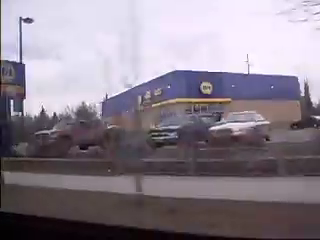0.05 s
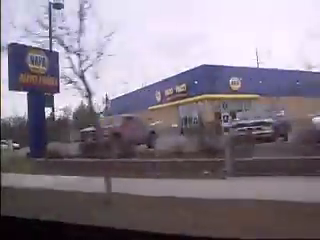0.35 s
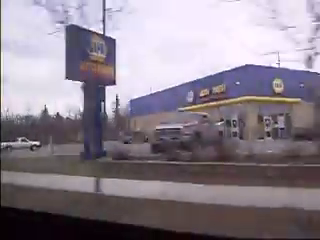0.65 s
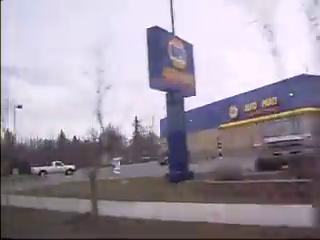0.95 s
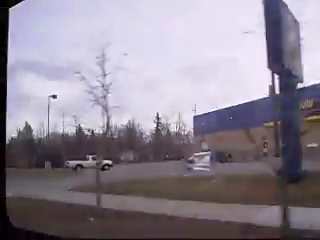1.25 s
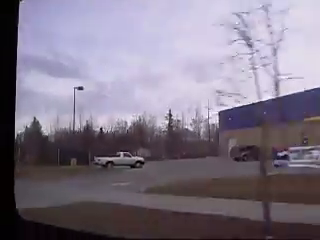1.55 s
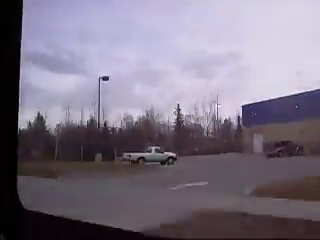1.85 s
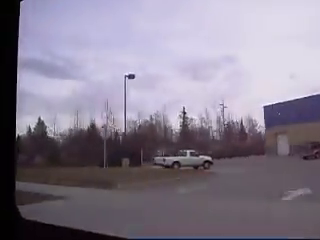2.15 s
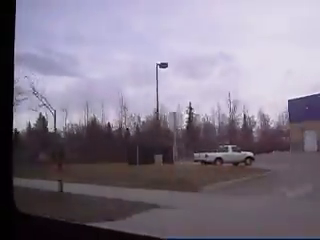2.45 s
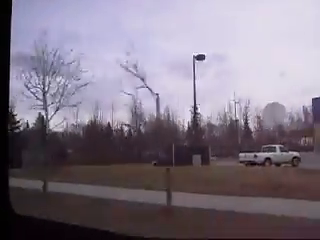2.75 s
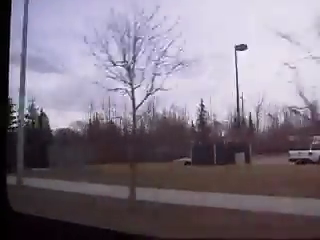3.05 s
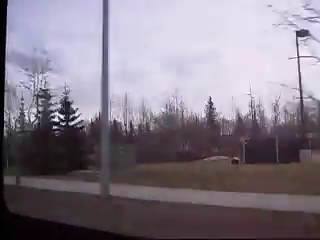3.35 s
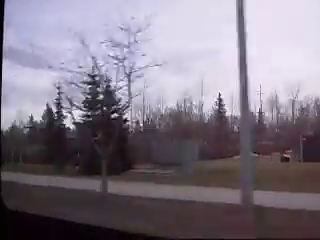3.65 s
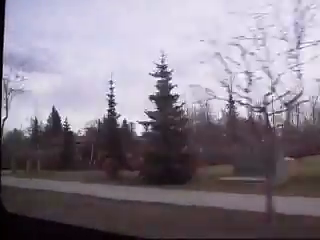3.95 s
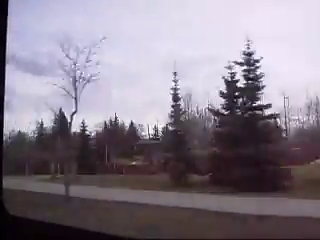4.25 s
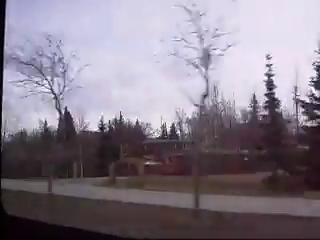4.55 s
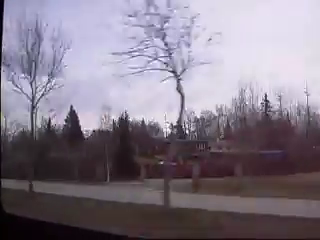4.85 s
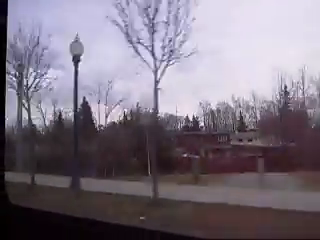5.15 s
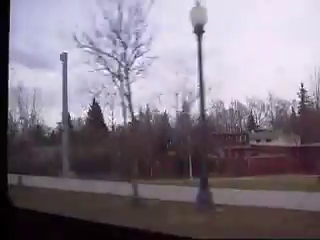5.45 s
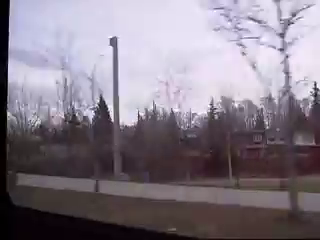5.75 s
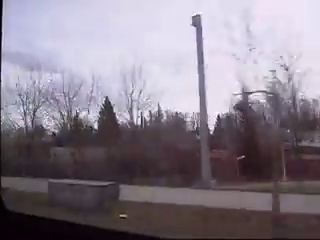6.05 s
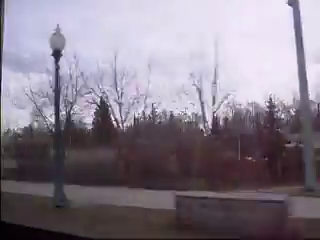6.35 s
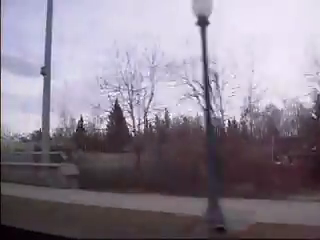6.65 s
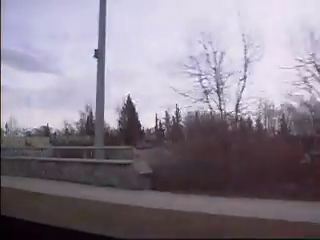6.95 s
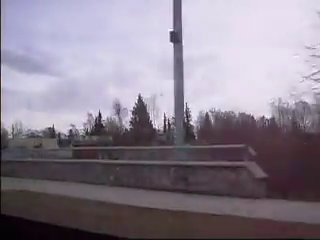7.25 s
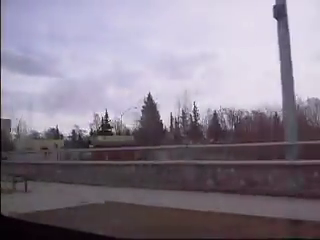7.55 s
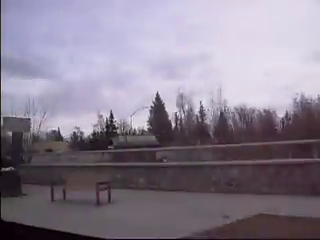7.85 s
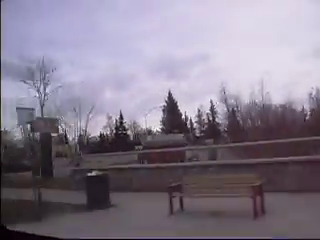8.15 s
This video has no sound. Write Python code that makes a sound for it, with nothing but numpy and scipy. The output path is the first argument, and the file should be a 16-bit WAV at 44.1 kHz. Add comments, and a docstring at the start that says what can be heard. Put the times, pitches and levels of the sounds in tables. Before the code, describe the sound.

Tyres roar through the body of a bus over a low engine hum, picked up by a dull-sounding microphone near the window that adds tiny irregular clicks. A brief puff of hiss comes first, then some mild thumps from the road. Wavering gear whines grow stronger as the engine slows slightly and turns boomier, and a final larger bump sets the cabin panels creaking and rattling.

```python
"""Riding a city bus

Heard by a small camera at a side window, the engine drones and booms more as it eases off,
gear whines ring up and die away, and the tyres roar through the body. A short hiss passes early on.
Bumps rock the cabin and lift the roar; the big one at the end makes the trim chafe, creak and knock.
The camera adds sharp little electrical ticks of its own."""
import sys
import numpy as np
from scipy import signal
from scipy.fft import rfft, irfft, next_fast_len
from scipy.io import wavfile
from scipy.ndimage import uniform_filter1d

SR = 44100
rng = np.random.default_rng(int(sys.argv[2]) if len(sys.argv) > 2 else 0)


def wav_record(signal):
    """Record a signal, one row per channel, as 16-bit PCM in the file named by sys.argv[1]."""
    frames = np.transpose(np.atleast_2d(signal))
    bounded = np.clip(frames, -1, 1)
    # unit amplitude maps onto the largest positive 16-bit level
    quanta = np.round(bounded * 32767).astype(np.int16)
    wavfile.write(sys.argv[1], SR, quanta)


N = 366030
TIME = np.arange(N) / SR

# bumps that rock the body: t/s, half width/s, level/dB
ROAD_BUMPS = [(1.31, .05, -27), (3.63, .025, -22), (4.18, .08, -32), (7.98, .04, -27), (8.105, .03, -15.5),
              (8.172, .014, -21)]


def undb(db):
    """Decibels to gain."""
    return 10 ** (np.asarray(db) / 20)


def unit(x):
    """Scale to rms 1."""
    return x / np.sqrt(np.mean(x ** 2))


def swells(rows):
    """An envelope of bell-shaped swells from rows of t/s, half width/s, level/dB."""
    return sum(undb(db) * np.exp(-.5 * ((TIME - s) / width) ** 2) for s, width, db in rows)


def spike(s, db, width_s):
    """A single bell-shaped spike with no ring."""
    out, around = np.zeros(N), np.arange(-50, 51)
    out[np.clip(int(s * SR) + around, 0, N - 1)] = undb(db) * np.exp(-.5 * (around / SR / width_s) ** 2)
    return out


def wander(rate):
    """A smooth random drift at rms 1, with about rate new values a second."""
    k = int(SR / rate)
    steps = np.repeat(rng.standard_normal(N // k + 2), k)
    return unit(uniform_filter1d(uniform_filter1d(steps, k), k)[:N])


def colour(x, curve):
    """Shape x with an EQ curve of f/Hz, level/dB, and return it at rms 1."""
    size = next_fast_len(N)
    hz = np.maximum(np.arange(size // 2 + 1) * SR / size, 1)
    curve_hz, db = np.transpose(curve)
    low_cut = np.minimum(hz / curve_hz[0], 1) ** 2
    gain = undb(np.interp(np.log(hz), np.log(curve_hz), db)) * low_cut
    return unit(irfft(rfft(x, size) * gain, size)[:N])


def low_pass(x, hz):
    """A steep treble cut."""
    taps = signal.firwin(111, hz, window=("kaiser", 7), fs=SR)
    return signal.fftconvolve(x, taps[None], mode="same", axes=1)


def tone(cycles, order, shimmer_db, jitter_rad):
    """A sine at a multiple of the cycle rate, wavering in level and phase."""
    phase = 2 * np.pi * (order * cycles + rng.random()) + jitter_rad * wander(14)
    return np.sqrt(2) * np.sin(phase) * undb(shimmer_db * wander(16))


def engine_drone(cycles, drone_db=-28):
    """Four firings a cycle make the deep drone; unequal cylinders and gears add weaker tones."""
    # steady engine and drive tones: multiple of the cycle rate, level/dB
    overtones = [(6, -42), (7, -47), (9, -40.5), (11, -42.5), (12, -42.5), (13, -52), (14, -47), (15, -50),
                 (16, -52), (19, -50), (20, -49), (21, -49), (23, -48), (24, -44), (27, -47.5), (28, -47.5),
                 (29, -44.5), (30, -47.5), (30.7, -44.5), (32, -45), (33, -46.5), (34, -49), (61, -48)]
    drone = undb(drone_db) * tone(cycles, order=4, shimmer_db=.5, jitter_rad=.06)
    return drone + sum(undb(db) * tone(cycles, order, shimmer_db=3.5, jitter_rad=.36)
                       for order, db in overtones)


def engine_boom(cycles, cycle_hz, cruise_hz=13.14, cruise_db=-43.5, growth_db_per_hz=15):
    """The second firing harmonic grows as the engine slows."""
    level_db = cruise_db + growth_db_per_hz * (cruise_hz - cycle_hz)
    return tone(cycles, order=8, shimmer_db=1, jitter_rad=.15) * undb(level_db)


def whine_envelope(start, hold, db, rise_s=.04, fall_s=.055, sag_db_per_s=1.5):
    """A whine rings up, sags slowly while held, and dies away."""
    early, late = np.maximum(start - TIME, 0), np.maximum(TIME - start - hold, 0)
    sag_db = sag_db_per_s * np.maximum(TIME - start, 0)
    return undb(db - sag_db) * np.exp(-early / rise_s - late / fall_s)


def gear_whines(cycles, blur_rad=.85, steady_db=-33, throb_depth=.25):
    """Gear meshes sing as load comes and goes; uneven teeth make them flutter."""
    # meshes by name: multiple of the cycle rate, resting level/dB, flutter depth
    meshes = {"low": (35.5, -46, .12), "under": (38.9, -46, .2), "main": (40.5, -42.5, .13),
              "middle": (55.07, -52, .16), "high": (59.85, -46, .3), "top": (71, -50, .3),
              "thin": (95.25, -55, .3), "whistle": (164, -69, .45)}
    # whines that ring up: mesh name, t/s, hold/s, level/dB
    whines = [("main", 0.33, .27, -33), ("main", 1.333, 0.1, -28.5), ("main", 2.334, 0.046, -26.5),
              ("main", 2.48, .06, -32), ("main", 2.71, 0.078, -29), ("main", 3.33, 0.27, -36),
              ("main", 3.65, .58, -33), ("main", 4.7, .2, -30), ("main", 4.93, .1, -24.5),
              ("main", 5.05, 0.43, -23.2), ("main", 5.58, 0.14, -26), ("main", 5.78, 0.17, -29.5),
              ("main", 6.14, 0.056, -25.5), ("main", 6.32, 0.43, -24.3), ("main", 6.86, 0.063, -22.5),
              ("main", 7.02, 0.086, -24), ("main", 7.22, 0.1, -27.5), ("main", 7.4, .24, -30.5),
              ("main", 7.83, 0.3, -28), ("high", .3, .4, -37), ("high", 1.02, .05, -32.5),
              ("high", 1.25, .6, -39), ("high", 2.35, 0.041, -28.5), ("high", 2.52, 0.042, -31.5),
              ("high", 3.236, .1, -32), ("high", 3.4, .25, -38), ("high", 3.69, 0.32, -33),
              ("high", 4.12, 0.25, -34.5), ("high", 4.45, .42, -34), ("high", 4.98, 0.085, -30.5),
              ("high", 5.15, 0.11, -37), ("high", 5.55, 0.41, -36), ("high", 6.1, 0.05, -33),
              ("low", 1.35, 0.48, -36), ("low", 3.31, .14, -33.5), ("low", 3.76, 0.75, -31.3),
              ("low", 4.95, 0.055, -35.5), ("low", 5.74, .22, -31), ("low", 6.15, .17, -34.5),
              ("low", 6.46, .38, -30.5), ("low", 6.9, .6, -32.5), ("low", 7.7, .5, -34.5),
              ("under", 5.35, .55, -31.5), ("under", 7, 1.3, -36), ("middle", 6.4, .72, -33.5),
              ("middle", 7.2, 1.3, -37), ("top", 1, 0.82, -41.5), ("top", 4.75, .85, -42),
              ("thin", 2.3, 1.1, -47), ("whistle", .28, .28, -57), ("whistle", 1.97, .3, -58.5),
              ("whistle", 3.08, 0.81, -57.5), ("whistle", 4.28, .32, -54)]
    out = 0
    for mesh, (order, rest_db, flutter_depth) in meshes.items():
        gain = undb(rest_db)
        for name, start, hold, db in whines:
            if name == mesh:
                gain = np.maximum(gain, whine_envelope(start, hold, db))
        slack = 1 / (1 + gain / undb(steady_db))  # weak whines waver and throb the most
        flutter = 1 + flutter_depth * wander(45)
        throb = 1 + throb_depth * slack * np.sin(2 * np.pi * cycles)
        out += tone(cycles, order, shimmer_db=.6, jitter_rad=blur_rad * slack) * gain * flutter * throb
    return out


def cabin_shake(settle_s=.14):
    """The cabin's shaking energy, 0-1: it builds with each bump and settles afterwards."""
    decay = np.exp(-1 / (settle_s * SR))
    energy = signal.lfilter([1 - decay], [1, -decay], swells(ROAD_BUMPS) ** 2)
    return energy / energy.max()


def tyre_roar(shake, bump_lift_db=5, flutter_db=.53):
    """Tyres roar through the floor and windows, following the road surface and louder over bumps."""
    # colour of the roar inside the cabin: f/Hz, level/dB
    cabin_eq = [(15, 6.5), (60, -4.5), (80, 2), (125, -5), (160, -7.5), (190, -7.5), (220, -10), (270, -7),
                (330, -5.5), (410, -3), (470, -3), (520, -.5), (590, -3.5), (700, -4.5), (775, -2.5),
                (860, -7), (1250, -12), (1600, -21), (2400, -29.5), (3050, -30), (3600, -37), (4400, -36),
                (5150, -36), (5450, -41.5)]
    # the roar as the road surface changes: t/s, level/dB
    surface = [(0, -25.5), (.12, -24), (.85, -26), (1.08, -25), (1.25, -27), (1.42, -25), (1.8, -25),
               (1.98, -27), (2.18, -27.5), (2.38, -25.5), (2.7, -25), (3.15, -26), (3.6, -25), (4.3, -26),
               (5.4, -25.5), (5.7, -24.5), (6.1, -25), (7.6, -26), (8.3, -25.5)]
    roar = colour(rng.standard_normal(N), cabin_eq)
    surface_db = np.interp(TIME, *np.transpose(surface))
    return roar * undb(surface_db + bump_lift_db * shake + flutter_db * wander(15))


def body_thuds(body_hz=20, sway_db=-2.5, rumble_db=-5):
    """Uneven road swings the body at its lowest resonance, with a deep rumble on top."""
    # colour of the rumble: f/Hz, level/dB
    rumble_eq = [(10, -2), (20, 5.5), (35, 6.5), (70, -13.5), (150, -26.5), (400, -47)]
    sway = undb(sway_db) * tone(TIME, body_hz, shimmer_db=1.5, jitter_rad=.3)
    rumble = undb(rumble_db) * colour(rng.standard_normal(N), rumble_eq)
    return (sway + rumble) * swells(ROAD_BUMPS)


def panel_knocks():
    """On the big bump a loose panel strikes its frame and rings briefly."""
    # hits on the frame: t/s, level/dB
    hits = [(8.073, -25), (8.121, -20.5), (8.173, -24)]
    # panel modes: f/Hz, level/dB, t60/s
    modes = [(560, -2, .05), (740, -2, .045), (940, -1, .04), (1180, -3, .035)]
    out = 0
    for s, db in hits:
        age = np.maximum(TIME - s, 0)
        for hz, mode_db, t60 in modes:
            out += undb(db + mode_db - 60 * age / t60) * np.sin(2 * np.pi * hz * age)
    return out


def trim_chafe(slips_per_s=2500, spread_db=3):
    """Shaken panels chafe: dense tiny slips of uneven size."""
    # colour of the rubbing trim: f/Hz, level/dB
    trim_eq = [(400, -9.5), (1000, 15), (1600, 3.5), (2200, 2), (2850, 2), (3700, -5), (4600, -4.5),
               (5050, -4.5), (5600, -8)]
    # rubs on the big bump: t/s, half width/s, level/dB
    rubs = [(7.99, 0.018, -38.5), (8.115, 0.055, -34.5), (8.22, 0.14, -32.5)]
    slips = (rng.random(N) < slips_per_s / SR) * rng.standard_normal(N)
    slips *= undb(spread_db * rng.standard_normal(N))
    return colour(slips, trim_eq) * swells(rubs)


def fixture_creaks(slips_per_s=900, ring_hz=2770, skirt_db_per_octave=-31.5):
    """A fixture sticks and slips as the body twists, ringing one narrow resonance."""
    # creaks on the big bump: t/s, half width/s, level/dB
    creaks = [(7.975, 0.006, -41.5), (8.002, .016, -43), (8.105, .02, -39), (8.172, 0.0073, -36.5)]
    slips = (rng.random(N) < slips_per_s / SR) * rng.standard_normal(N)
    resonance = [(ring_hz / 2, skirt_db_per_octave), (ring_hz, 0), (ring_hz * 2, skirt_db_per_octave)]
    return colour(slips, resonance) * swells(creaks)


def short_hiss(start_s=.692, level_db=-36, rise_s=.013, fade_after_s=.036, fall_s=.04):
    """A brief puff of bright noise that starts abruptly and trails off."""
    # colour of the puff: f/Hz, level/dB
    puff_eq = [(1400, 0), (1850, 3.5), (2250, -6), (2900, 1.5), (3550, -4.5), (4600, -2), (5100, -6),
               (5600, -10)]
    age = TIME - start_s
    attack = np.clip(age / rise_s, 0, 1)
    tail = np.exp(-np.maximum(age - fade_after_s, 0) / fall_s)
    return colour(rng.standard_normal(N), puff_eq) * attack * tail * undb(level_db)


def camera_ticks(period_s=.05, faint_db=-29, spread_db=2.5, width_s=.00005, swing_s=.00009, edge=.43):
    """Tiny electrical spikes of either polarity; faint ones recur on the camera's steady beat."""
    # the loudest ticks: t/s, level/dB, brightness 0-1
    loud = [(.0932, -15.5, 0), (0.1462, -3, 0), (.193, -14.5, .9), (.246, -12, 0.3), (.2935, -16.5, .6),
            (.344, -10.5, 0), (.445, -4.5, 0), (.5931, -19, 0), (.7931, -17, .9), (.846, -21, .9),
            (1.0441, -20, .6), (1.193, -20, 0), (1.2931, -16, 1), (1.3463, -19, 1), (1.447, -14.5, 0),
            (1.647, -19, 0), (1.7933, -16.5, 0.4), (1.9463, -20, .1), (2.2461, -5.5, 0), (2.2929, -15, .9),
            (2.3463, -21, 1), (2.6466, -11.5, 0), (2.7457, -19, .5), (2.8934, -19, .4), (2.946, -13.5, 0),
            (2.9933, -10.5, 0.2), (3.0459, -19, .5), (3.2934, -19, .5), (3.3932, -10, 0),
            (3.4935, -16.5, .8), (3.6473, -21, 0), (3.7931, -7, 0), (3.8934, -11, 0), (3.9931, -17.5, .8),
            (4.049, -5.5, 0.5), (4.0934, -12.5, 0), (4.1473, -8.5, 0), (4.248, -3.5, 0), (4.4471, -15, 0),
            (4.549, -18, .1), (4.7479, -1.5, 0.03), (4.8931, -14, 0), (4.9483, -12, 0.7), (4.993, -13.5, 0),
            (5.443, -11.5, 0.1), (5.493, -8, 0.7), (5.549, -13.5, 0), (5.593, -6.5, 0.25),
            (5.6486, -13, .6), (5.8437, -5.5, 0.8), (5.9932, -14, .1), (6.0461, -8, 0), (6.0932, -11, 0.8),
            (6.1477, -6.5, 0), (6.1929, -11, 0.6), (6.4932, -11.5, 0), (6.6462, -14.5, 0),
            (6.6934, -17, .9), (6.993, -14, 0), (7.0932, -12.5, 0), (7.2448, -11.5, 0), (7.293, -16, .8),
            (7.345, -11, 0), (7.4485, -17.5, .3), (7.493, -13.5, .1), (7.547, -17, .8), (7.5933, -18, 0),
            (7.693, -14.5, 0), (7.7931, -15.5, .6), (7.9443, -14.5, 1), (8.1513, -8.5, .2),
            (8.193, -8.5, 0.5)]
    beat = np.arange(.044, TIME[-1] - period_s, period_s)
    faint = [(s, faint_db + spread_db * rng.standard_normal(), rng.random()) for s in beat]
    out = np.zeros(N)
    for s, db, bright in loud + faint:
        flanks = (spike(s - swing_s, db, width_s) + spike(s + swing_s, db, width_s)) / 2
        tick = spike(s, db, width_s) - bright * flanks  # bright ticks swing back on both sides
        out += rng.choice([-1, 1]) * tick / (1 + bright / 2)
    dulled = low_pass(out[None], hz=5000)[0]
    return edge * out + (1 - edge) * dulled


def scene():
    """Drive, road and rattles all reach one microphone by the window."""
    # engine speed as it eases off: t/s, four-stroke cycle rate/Hz
    engine_speed = [(0, 13.24), (1.2, 13.19), (2.4, 13.18), (3.5, 13.13), (4.4, 12.9), (5, 12.71),
                    (5.5, 12.62), (6, 12.46), (7.5, 12.54), (8.3, 12.47)]
    cycle_hz = np.interp(TIME, *np.transpose(engine_speed))
    cycles = np.cumsum(cycle_hz) / SR
    drive = engine_drone(cycles) + engine_boom(cycles, cycle_hz) + gear_whines(cycles)
    road = tyre_roar(cabin_shake()) + body_thuds()
    rattles = trim_chafe() + fixture_creaks() + panel_knocks()
    return (drive + road + rattles + short_hiss() + camera_ticks())[None]


def record(dry):
    """The camera's narrow channel cuts the treble; one sharp digital click is added after that cut."""
    digital_click = spike(s=4.2478, db=-15.5, width_s=.00002)
    return low_pass(low_pass(dry, hz=5700) + digital_click, hz=16300)


dry = scene()
out = record(dry)
wav_record(out)
```